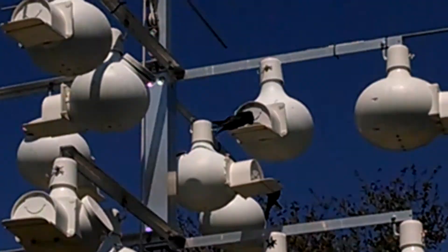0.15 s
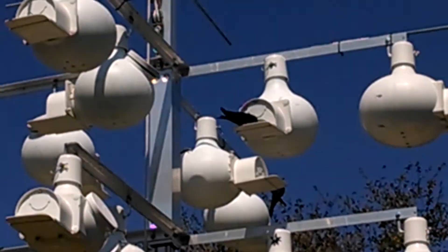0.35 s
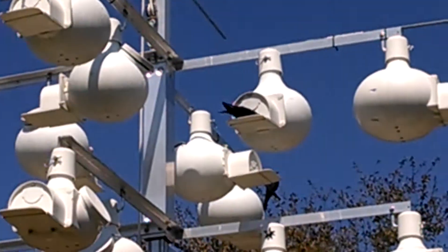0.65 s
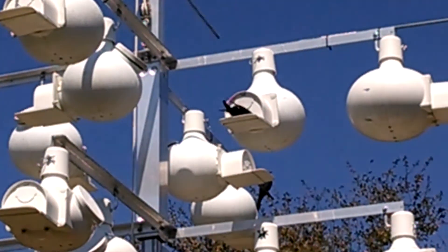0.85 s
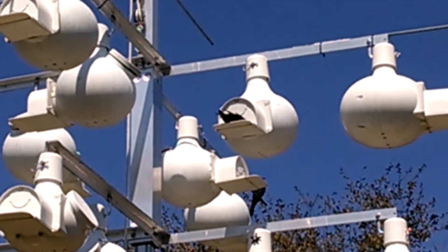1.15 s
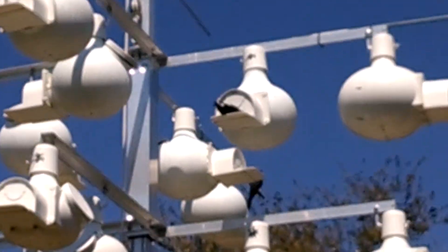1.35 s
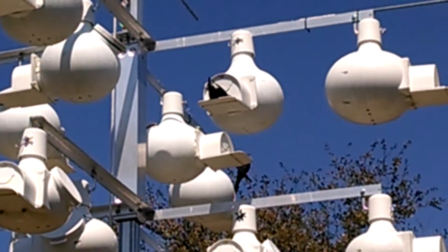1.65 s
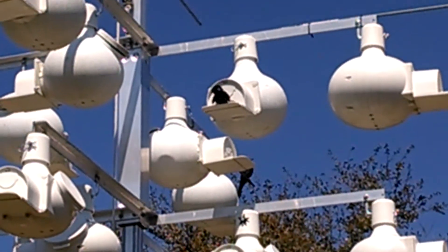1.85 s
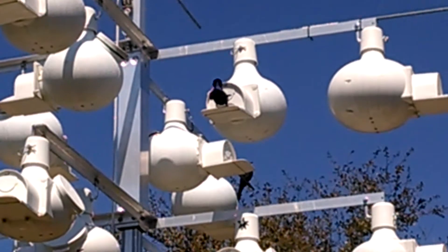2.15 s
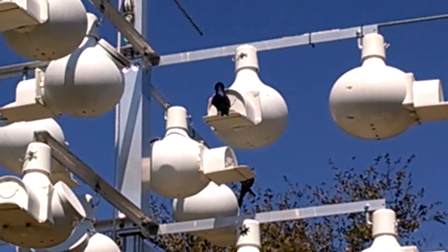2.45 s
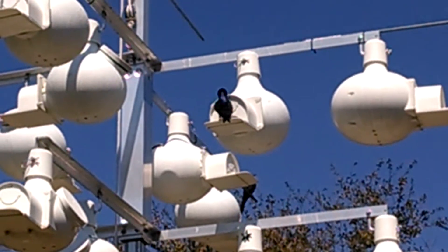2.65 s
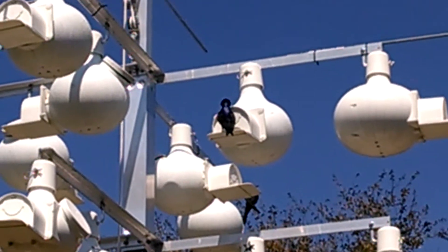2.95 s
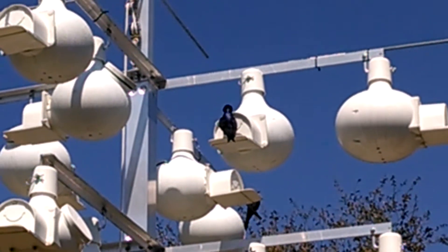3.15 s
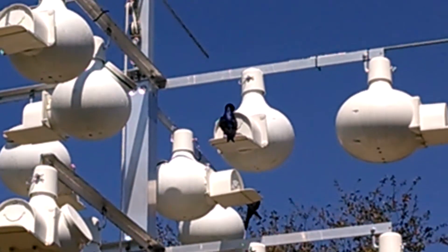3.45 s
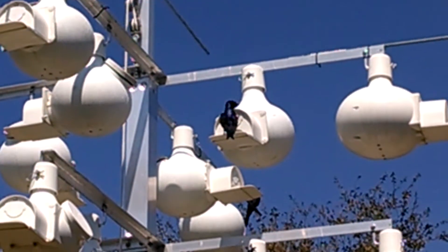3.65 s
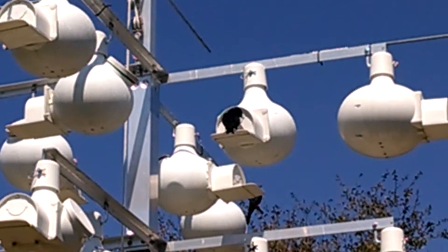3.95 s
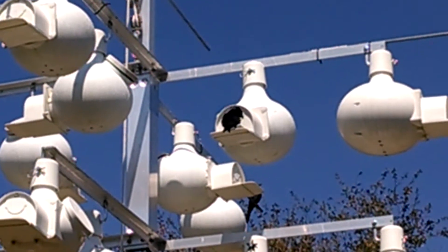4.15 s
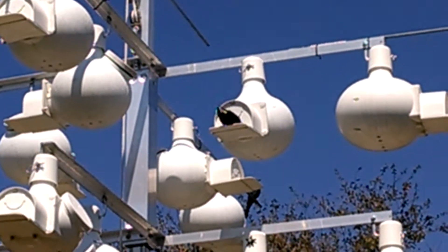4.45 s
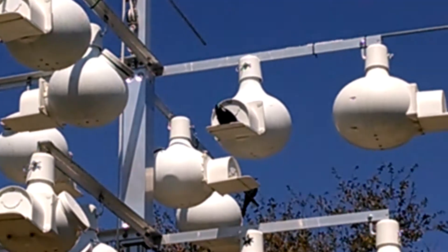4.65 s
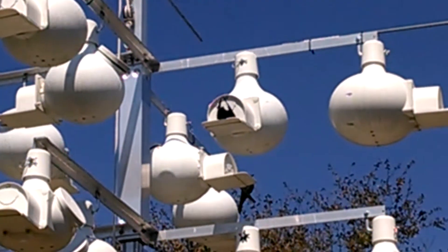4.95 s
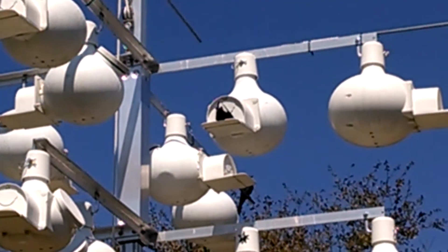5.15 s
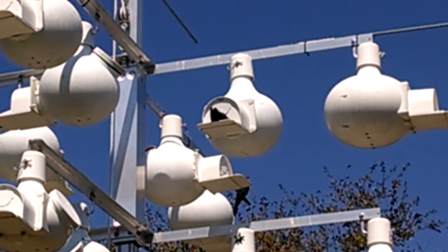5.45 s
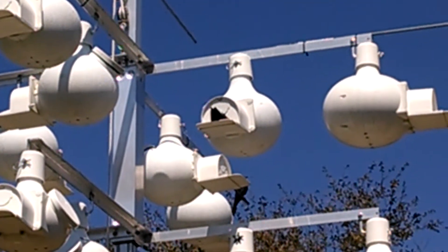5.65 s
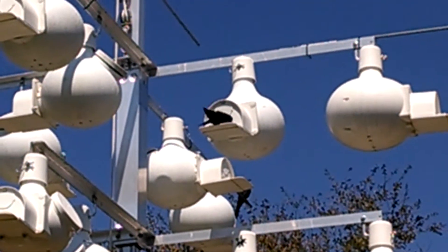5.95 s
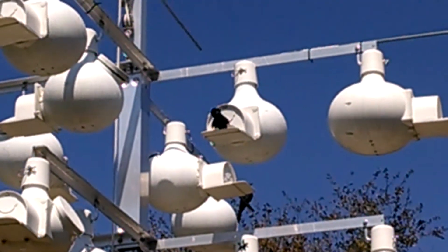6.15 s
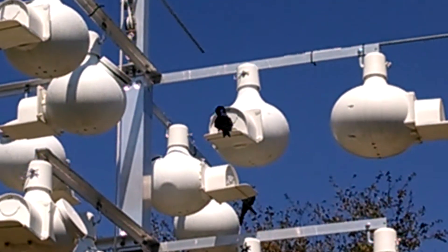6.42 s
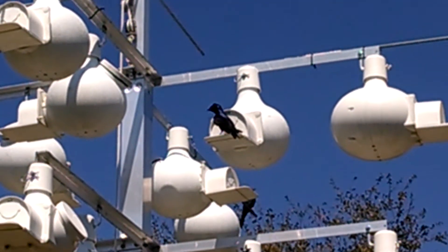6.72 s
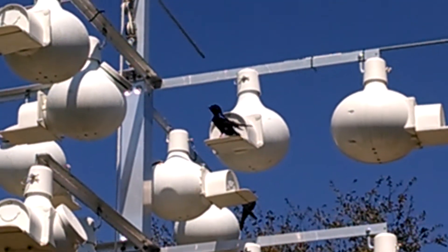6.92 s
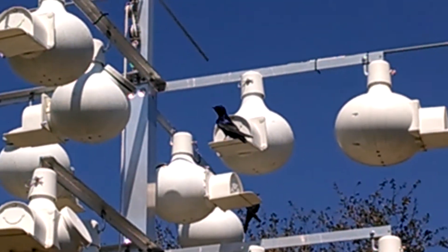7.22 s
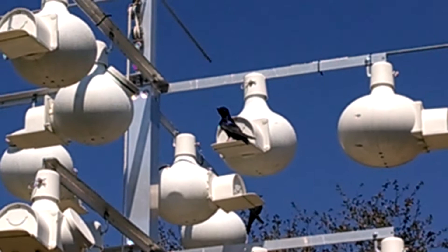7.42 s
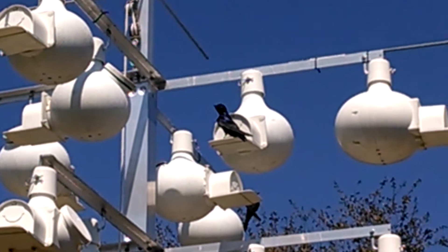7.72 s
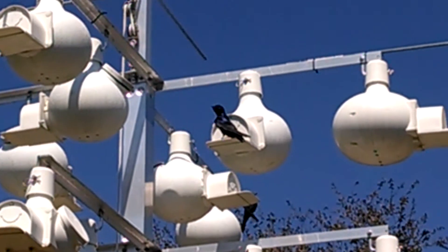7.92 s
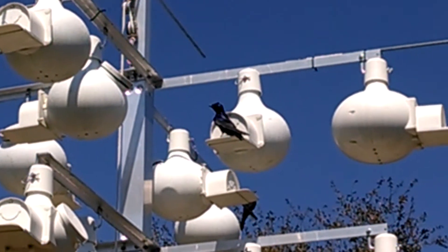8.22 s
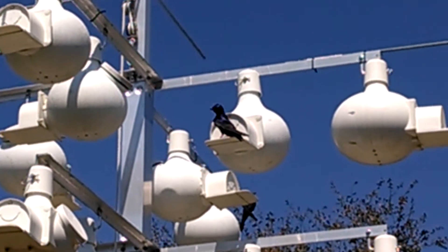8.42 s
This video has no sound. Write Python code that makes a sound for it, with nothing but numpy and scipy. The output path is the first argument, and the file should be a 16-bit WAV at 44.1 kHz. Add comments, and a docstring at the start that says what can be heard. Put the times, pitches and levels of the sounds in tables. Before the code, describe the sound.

Outdoor bird colony heard through a small camera microphone in light wind. Near martins give quick, pure gliding whistles, throaty gurgles, raspy chirps and electric-sounding buzzes, with one brief rattle; farther birds fill in with faint twitter. Chatter thins as a gust rumbles and flutters in the second second, then grows denser and brighter, continuing right to the end with light reflections from gourds and trees.

```python
"""Wind thumps softly at the microphone and a buzzy call opens the chatter of martins at a rack of nest gourds.
Each voice is a nearly pure gliding tone with weak overtones: falling strokes, trilled buzzes, a dry rattle.
Many fainter calls and a noise murmur make the farther birds; gourds and trees answer with echoes.
The wind is lumpy low noise with single pressure swings, strongest in the second second, over a faint hiss.
"""
import sys
import numpy as np
from scipy import signal
from scipy.fft import rfft, irfft, next_fast_len
from scipy.io import wavfile
from scipy.ndimage import uniform_filter1d, map_coordinates

SR = 44100
rng = np.random.default_rng(int(sys.argv[2]) if len(sys.argv) > 2 else 0)


def int16_out(signal):
    """Quantize to a 16-bit WAV file."""
    q = np.round(np.clip(np.atleast_2d(signal).T, -1, 1) * 32767)
    wavfile.write(sys.argv[1], SR, q.astype(np.int16))


N = 378378


def amp(db):
    """Decibels to gain."""
    return 10 ** (np.asarray(db) / 20)


def unit(x):
    """Scale to rms 1."""
    return x / np.sqrt(np.mean(x ** 2) + 1e-20)


def along(points, hz):
    """Read (frequency, value) points on a log frequency axis."""
    f, v = np.transpose(points)
    return np.interp(np.log(hz + 1), np.log(f + 1), v)


def curves(rows):
    """One value per sample for each column after the time."""
    s, *cols = np.transpose(rows)
    return [np.interp(np.arange(N) / SR, s, c) for c in cols]


def wobble(rate, size):
    """A smooth random curve, rate knots a second."""
    knots = rng.standard_normal(int(size * rate / SR) + 4)
    return map_coordinates(knots, [np.arange(size) * rate / SR])


def filtered(x, response):
    """x times a complex response of frequency."""
    m = next_fast_len(N + SR // 4)
    return irfft(rfft(x, m) * response(np.fft.rfftfreq(m, 1 / SR)), m)[..., :N]


def noise(spectrum):
    """Coloured noise of rms 1."""
    return unit(filtered(rng.standard_normal(N), lambda hz: amp(along(spectrum, hz))))


def add(track, s, sound):
    """Mix a sound into a track at time s."""
    start = int(np.clip(round(s * SR), 0, N))
    track[..., start:start + sound.shape[-1]] += sound[..., :N - start]


# colour of the faint hiss: (frequency [Hz], relative level [dB])
AIR_COLOUR = [(100, -2), (600, 24), (1200, 4), (5000, -17), (9300, 11.5), (11500, 4), (15000, 3)]


def air(air_db=-60):
    """Steady hiss: independent coloured noise in each channel."""
    return amp(air_db) * np.array([noise(AIR_COLOUR), noise(AIR_COLOUR)])


# strongest eddies that thump the microphone: (time [s], relative level [dB])
BUFFETS = [(.015, -13), (0.054, -12), (.686, -14.5), (0.769, -11), (.819, -14.5), (.847, -13.5),
           (.865, -16), (0.951, -8), (0.972, -12), (.985, -4.5), (1.127, -11), (1.243, -5), (1.287, 2.5),
           (1.313, -2), (1.359, -4), (1.371, -13), (1.38, 5), (1.394, -1), (1.411, -3.5), (1.489, -14),
           (1.508, -6.5), (1.53, -8), (1.586, -9), (1.601, -4), (1.621, -5.5), (1.637, -3), (1.665, -12),
           (1.747, -8.5), (1.763, -6.5), (1.774, -4), (1.821, -7.5), (1.869, -9.5), (1.927, -10),
           (1.99, -17), (2.121, -10), (2.143, -9.5), (2.262, -13), (2.325, -18), (2.412, -13),
           (2.558, -14.5), (2.616, -10.5), (2.736, -14.5), (2.896, -17.5), (2.949, -17), (2.997, -8.5),
           (3.026, -14.5), (3.423, -9.5), (3.481, -11.5), (4.133, -11), (4.597, -10.5), (4.655, -12),
           (4.696, -16), (4.714, -10), (4.766, -5.5), (5.133, -16.5), (5.186, -20), (5.334, -15),
           (5.436, -15.5), (5.534, -13.5), (5.745, -11.5), (5.815, -14), (5.889, -12), (5.915, -15.5),
           (5.931, -15), (6.314, -7), (6.606, -11), (6.64, -16), (6.724, -8), (6.742, -11.5),
           (6.786, -13.5), (6.835, -9), (6.866, -8.5), (6.956, -11.5), (6.978, -9.5), (6.998, -3.5),
           (7.034, -19), (7.056, -8), (7.205, -11.5), (7.28, -6), (7.532, -13.5), (7.831, -15.5),
           (8.082, -11.5), (8.259, -13), (8.274, -16.5), (8.384, -15), (8.408, -14.5), (8.482, -16.5)]
# an eddy's pitch at a strength of 0 dB, and the gain in strength that doubles it
EDDY_HZ, EDDY_DOUBLING_DB = 232, 26


def eddies(level_db, count=110, small_db=14, spread_db=6.0, buffet_db=-2.0, shed_db=-10, shed_s=.006, size=3):
    """A passing vortex is one pressure swing, briefer when stronger; small chance ones follow the wind's level."""
    x, t = np.zeros(N), np.arange(-SR // 50, SR // 50) / SR
    small = []
    for when, luck in rng.random((count, 2)):
        small.append((when * N / SR, level_db[int(when * N)] + small_db + spread_db * (2 * luck - 1)))
    for s, db in list(BUFFETS) + small:
        hz = EDDY_HZ * 2 ** (db / EDDY_DOUBLING_DB)
        # lesser swings scattered around the main one crackle
        shed = [(shed_s * lag, db + shed_db + 2 * luck) for lag, luck in rng.standard_normal((size, 2))]
        for lag, swing_db in [(0, db)] + shed:
            turn = np.exp(2j * np.pi * rng.random())  # random phase
            swing = np.real(turn / (1 - 1j * np.pi * hz * t) ** 3)
            add(x, s + lag + t[0], amp(swing_db + buffet_db) * swing * np.hanning(len(t)))
    return x


# level at which the wind is heard, with brief dips: (time [s], relative level [dB])
WIND_LEVEL = [(0.0, -35), (0.02, -26), (0.21, -56.5), (0.26, -41), (0.93, -30), (1.19, -42), (1.29, -20),
              (1.43, -33.5), (1.86, -30.5), (2.05, -43.5), (2.27, -30.5), (2.48, -39.5), (2.84, -38.5),
              (2.91, -30), (3.11, -41), (3.15, -62), (3.23, -34), (3.34, -49.5), (3.44, -28.5), (3.58, -48),
              (4.11, -34.5), (4.28, -40.5), (4.78, -30), (4.97, -46), (5.21, -31), (5.3, -56.5),
              (5.45, -30), (5.47, -41), (6.0, -31.5), (6.02, -38.5), (7.05, -31), (7.33, -36),
              (8.51, -38.5), (8.58, -39)]
# extra level of the flutter over that level: (time [s], relative level [dB])
FLURRY_LEVEL = [(0, -28), (.5, -13), (1.25, 2.5), (1.45, 5), (1.62, 9.5), (1.95, 0), (2.3, 0), (3.4, 0.5),
                (3.8, -0.5), (4.7, 3), (6.3, 1.5), (6.9, 0), (8.58, 0.5)]
# colour of the slow part of the wind: (frequency [Hz], relative level [dB])
RUMBLE_COLOUR = [(10, -30), (25, -2), (60, 4), (120, 0), (200, -7.5), (320, -26), (600, -76), (1200, -73)]
# colour of the quicker part of the wind: (frequency [Hz], relative level [dB])
FLUTTER_COLOUR = [(60, -40), (170, 0.5), (280, 8), (420, 0.5), (650, -19), (1000, -24.5), (1600, -40.5),
                  (4000, -75)]


def wind(rumble_db=13.5, flutter_db=-10.0, lump_db=6):
    """Turbulence at the microphone: lumpy rumble and flutter with eddies, the channels swinging in opposition."""
    low_db, = curves(WIND_LEVEL)
    flurry_db, = curves(FLURRY_LEVEL)
    lumps = np.tanh(wobble(60, N))
    rumble = unit(noise(RUMBLE_COLOUR) * amp(8.5 * lumps))
    flutter = unit(noise(FLUTTER_COLOUR) * amp(lump_db * lumps))
    x = amp(low_db + rumble_db) * rumble
    x += amp(low_db + flurry_db + flutter_db) * flutter
    x += eddies(low_db + flurry_db / 2)
    left = filtered(x, lambda hz: np.exp(-2j * np.pi * hz * .00052))  # 0.52 ms late
    return np.array([left * amp(1.6), -x * amp(-1.7)])


# decay of the trees' echo: (frequency [Hz], time to fall 60 dB [s])
TREE_DECAY = [(1500, 0.036), (3500, 0.26), (9000, 0.086)]


def echoes(x, gourds_db, trees_db, spread_s=.04, count=36):
    """Quick reflections off the gourds and a diffuse tail from the trees, drawn anew for each crossfaded stretch."""
    out, hop, t = np.zeros(N), SR // 4, np.arange(SR // 3) / SR
    for start in range(-hop, N, hop):
        lo, hi = max(start, 0), min(start + 2 * hop, N)
        piece = x[lo:hi] * np.sin(np.pi * (np.arange(lo, hi) - start) / (2 * hop))
        # tail: noise that dies at its own pace in each band, after a soft onset
        hz, age, z = signal.stft(rng.standard_normal(len(t)), SR, nperseg=256)
        decay = amp(-60 * age / along(TREE_DECAY, hz)[:, None])
        tail = signal.istft(z * decay, SR)[1][:len(t)]
        response = amp(trees_db) * unit(tail * (1 - np.exp(-t / 0.004))) / np.sqrt(len(t))
        delays = 0.0015 + spread_s * rng.random(count) ** 2
        taps = amp(gourds_db) * rng.choice([-1, 1], count) / np.sqrt(count)
        np.add.at(response, (delays * SR).astype(int), taps)
        add(out, lo / SR, signal.fftconvolve(piece, response))
    return out


def syrinx(pitch, loudness, second_db, third_db):
    """Two rows: a nearly pure whistle, and its second and third harmonics."""
    phase = 2 * np.pi * np.cumsum(pitch) / SR + rng.uniform(0, 2 * np.pi)
    overtones = amp(second_db) * np.sin(2 * phase) + amp(third_db) * np.sin(3 * phase)
    return loudness * np.array([np.sin(phase), overtones])


# how strongly a voice carries at each pitch: (pitch [Hz], relative level [dB])
VOICE_STRENGTH = [(1300, -21.5), (2000, -7.5), (2600, -4), (3400, 2), (3900, 2), (4500, 5.5), (5100, 16)]
# throat resonance that a chirp plunges through: centre, half width, boost
THROAT_HZ, THROAT_WIDTH_HZ, THROAT_DB = 3620, 200, 3.5
LATE_SWELL = 1.157  # above 1, a chirp starts softly and swells late


def chirp(length, start_hz, end_hz, bend=0.257, waver=0.017, shimmer_db=2.0, second_db=-28, third_db=-34):
    """A gliding whistle, swelling at the voice's resonances; a fall flattens out if bend > 0, else steepens."""
    u = np.linspace(0, 1, max(int(length * SR), 64))
    pitch = start_hz * (end_hz / start_hz) ** (u + bend * u * (1 - u))
    throat_db = THROAT_DB * np.exp(-((pitch - THROAT_HZ) / THROAT_WIDTH_HZ) ** 2)
    swell = np.sin(np.pi * u ** LATE_SWELL) ** 0.75
    swell = swell * amp(along(VOICE_STRENGTH, pitch) + throat_db)
    swell = swell / swell.max() * amp(shimmer_db * wobble(250, len(u)))
    return syrinx(pitch * (1 + waver * wobble(600, len(u))), swell, second_db, third_db)


# colour of the overtones: (frequency [Hz], relative level [dB])
OVERTONE_COLOUR = [(3000, -3), (4300, -13), (5200, 1), (6400, 2), (7200, -3.5), (8000, -2), (9300, 1),
                   (11500, -18), (15000, 0)]


def beak(voice, overtone_db=0):
    """The open beak joins the whistle to its overtones, made grainy and heard with their own reflections."""
    grain = .7 + .7 * wobble(1300, N)
    bright = filtered(voice[1] * grain, lambda hz: amp(along(OVERTONE_COLOUR, hz)))
    return voice[0] + amp(overtone_db) * (bright + echoes(bright, gourds_db=-3.5, trees_db=-20.0))


# kinds of faint call: (share of all calls [0-1], strokes [count], start pitch [Hz], spread of pitch [log ratio],
# stroke length [s], end over start pitch [ratio], bend of the glide [-], relative level [dB])
FAR_CALLS = [(.2, 3, 2500, 0.121, 0.02005, .62, -0.312, -6),
             (.12, 2, 1850, 0.0794, 0.01866, 0.635, -0.41, -13.5),
             (.46, 1, 4050, 0.0704, 0.016, .78, 0.019, -6.5), (.12, 1, 2950, .12, 0.022, .73, -0.019, -1),
             (.1, 1, 2400, .1, .04, 0.86, 0.37, -6)]


def far_birds(count=960, stroke_gap_s=.021, variety=.2, slope_spread=0.2785):
    """Faint gurgles, chirps and slurs, each with its own pitch, pace and slope, evened out in level."""
    voice = np.zeros((2, N))
    for share, strokes, hz, spread, length, fall, bend, db in FAR_CALLS:
        calls = round(share * count)
        draws = np.clip(rng.standard_normal((calls, 5)), -2, 2)
        for turn, (when, tune, size, slow, slope) in enumerate(draws):
            top, stretch = hz * np.exp(spread * tune), np.exp(variety * slow)
            end = top * fall ** (1 + slope_spread * slope)
            note = chirp(length * stretch, top, end, bend, waver=.016, second_db=-23, third_db=-23.5)
            note = amp(db + 3 * size) * note
            s = (turn + when) / calls * N / SR
            for stroke in range(round(strokes)):
                add(voice, s + stroke * stroke_gap_s * stretch, note)
    x = unit(beak(voice, overtone_db=2.0))
    return x / np.sqrt(np.abs(uniform_filter1d(x ** 2, size=4500)) + 0.42)


# level at which the farther chatter is heard, sinking between 1.1 and 1.9 s: (time [s], relative level [dB])
CROWD_LEVEL = [(0, -40), (.3, -54), (.47, -37.5), (.66, -41.5), (.8, -39), (1.1, -49), (1.5, -53.5),
               (2.1, -45), (2.9, -41.5), (3.3, -44), (3.8, -41), (4.2, -36), (4.9, -39), (5.6, -36.5),
               (6.5, -40), (7.1, -39), (7.8, -38), (8.1, -37.5), (8.58, -38)]
# colour of the blurred murmur, shared by the rasp of the near calls: (frequency [Hz], relative level [dB])
MURMUR_COLOUR = [(600, -15.5), (1000, -14), (1250, -8), (1550, -19.5), (2000, -7), (2600, -8.5),
                 (3400, -35), (4100, -8.5), (5100, -7.5), (6400, -19.5), (8000, -36.5), (9300, -18.5),
                 (11500, -28)]


def crowd(far_db=1):
    """The farther birds with their echoes, over a murmur of coloured noise."""
    crowd_db, = curves(CROWD_LEVEL)
    far = far_birds()
    far = unit(far + echoes(far, gourds_db=-4, trees_db=-7.5))
    murmur = amp(-11) * noise(MURMUR_COLOUR)
    return amp(crowd_db + far_db) * (far + murmur)


# thin rising whistles: (time [s], length [s], start pitch [Hz], end pitch [Hz], relative level [dB])
SQUEAKS = [(5.769, 0.027, 5150, 6570, -35), (6.045, 0.036, 5500, 6200, -41)]


def squeaks(squeak_db=0):
    """Thin whistles that glide upward, without overtones."""
    voice = np.zeros((2, N))
    for s, length, start_hz, end_hz, db in SQUEAKS:
        add(voice[0], s, amp(db + squeak_db) * chirp(length, start_hz, end_hz)[0])
    return voice


# sliding whistles: (time [s], length [s], start pitch [Hz], end pitch [Hz], relative level [dB])
SLURS = [(2.373, 0.063, 3480, 1920, -33), (4.874, 0.033, 2270, 2050, -37), (5.439, 0.06, 2950, 2060, -36),
         (5.637, 0.11, 2770, 1766, -33.5), (6.153, 0.0325, 2640, 2220, -32),
         (6.307, .075, 2450, 1907, -29.5), (6.616, 0.063, 3500, 1960, -26.5),
         (6.681, 0.055, 2120, 1907, -31.5), (6.804, 0.034, 2020, 1835, -31),
         (7.767, 0.02, 2270, 2130, -34.5), (8.097, 0.0436, 2103, 1736, -34),
         (8.14, 0.044, 2560, 2063, -25.5), (8.177, .035, 2090, 1960, -36)]


def slurs(slur_db=0):
    """Clear whistles that slide down and level off."""
    voice = np.zeros((2, N))
    for s, length, start_hz, end_hz, db in SLURS:
        note = chirp(length, start_hz, end_hz, bend=0.36, waver=0.0021, shimmer_db=-4.5,
                     second_db=-22.0, third_db=-27.0)
        add(voice, s, amp(db + slur_db) * note)
    return voice


# gurgles, each a run of low falling strokes: (time [s], relative level [dB])
GURGLES = [(-.018, -38), (0.156, -28), (.403, -25), (0.572, -23), (6.453, -30)]
# strokes of a gurgle: spacing, length, highest start, end over start; the outer strokes are lower and softer
STROKE_GAP_S, STROKE_S, STROKE_HZ, STROKE_FALL, EDGE_OCTAVES, EDGE_DB = .02, .022, 2643, .53, 0.435, 15.5


def gurgles(count=5):
    """Runs of quick, steepening strokes that arch in pitch and strength."""
    voice = np.zeros((2, N))
    for s, db in GURGLES:
        for stroke, edge in enumerate(np.linspace(-1, 1, count) ** 4):
            top = STROKE_HZ * 2 ** (-EDGE_OCTAVES * edge)
            note = chirp(STROKE_S, top, top * STROKE_FALL, bend=-.5, second_db=-14, third_db=-18)
            add(voice, s + stroke * STROKE_GAP_S, amp(db - EDGE_DB * edge) * note)
    return voice


# rasp of the harshest chirps: (time [s], length [s], relative level [dB])
SCREECHES = [(0.726, 0.22, -37.5), (0.915, 0.14, -41), (1.225, 0.12, -44), (1.963, 0.12, -52),
             (2.47, 0.13, -41.5), (3.112, 0.082, -39.5), (3.72, 0.21, -44), (4.723, 0.28, -44.5)]
# colour of that rasp: (frequency [Hz], relative level [dB])
SCREECH_COLOUR = [(2000, -9), (4200, 0.5), (5200, -6), (6400, -2), (7900, -5), (9300, -2.5), (11000, -29),
                  (15000, -24)]


def screeches(screech_db=-3):
    """Bright, flickering noise for the harshest chirps: a quick rise and a slower fade."""
    force = np.zeros(N)
    for s, length, db in SCREECHES:
        u = np.linspace(0, 1, int(length * SR))
        add(force, s, amp(db + screech_db) * np.sin(np.pi * np.sqrt(u)) ** 2)
    return force * unit(noise(SCREECH_COLOUR) * amp(3 * wobble(400, N)))


# one bird's rattle: start and spacing of the pips; how long it holds its pitch and level, then how they fall
RATTLE_S, PIP_GAP_S = 2.82, .0138
RATTLE_HOLD_S, RATTLE_HZ, RATTLE_SAG_HZ_PER_S, RATTLE_DB, RATTLE_FADE_DB_PER_S = .055, 3570, 8500, -18.5, 132


def rattle(pip_s=0.0084, drop=0.14, low_ratio=.55, low_db=-13, count=12):
    """Separate pips, each a brief drop in pitch over a low second voice; the train holds, then sags and fades."""
    voice, u = np.zeros((2, N)), np.linspace(0, 1, int(pip_s * SR))
    for pip in range(count):
        age = pip * PIP_GAP_S
        late = max(age - RATTLE_HOLD_S, 0)
        glide = 1 + drop * (.5 - u) + 0.06 * wobble(600, len(u))
        pitch = (RATTLE_HZ - RATTLE_SAG_HZ_PER_S * late) * glide
        swell = amp(RATTLE_DB - RATTLE_FADE_DB_PER_S * late) * np.sin(np.pi * u) ** 2
        low_pitch = low_ratio * pitch * (1 + 0.12 * wobble(480, len(u)))
        add(voice, RATTLE_S + age, syrinx(pitch, swell, second_db=-22, third_db=-29))
        add(voice, RATTLE_S + age, syrinx(low_pitch, amp(low_db) * swell, second_db=-20, third_db=-13))
    return voice


def buzz(length, pitches, crest, rough, overtone_db, trill_hz, low_ratio=.58, low_db=-27):
    """A curved note trilled too fast to follow; roughness deepens its pulses and lifts a low second voice."""
    u = np.linspace(0, 1, int(length * SR))
    n = len(u)
    trill = 2 * np.pi * np.cumsum(trill_hz * (1 + .09 * wobble(90, n))) / SR
    curve = np.polyval(np.polyfit([0, .5, 1], pitches, 2), u)
    pitch = curve * (1 + .036 * rough * wobble(500, n))
    swell = np.sin(np.pi * np.interp(u, [0, np.clip(crest, .22, .9), 1], [0, .5, 1])) ** .7
    harshness = rough / ROUGH_AT_FULL
    pulse = unit(amp(5.2 * harshness * np.sin(trill)))
    bend = 1 + .029 * np.cos(trill)
    voice = syrinx(pitch * bend, swell * pulse, second_db=overtone_db, third_db=overtone_db - 7.5)
    low_pitch = low_ratio * pitch * (1 + .05 * wobble(300, n))
    low_swell = amp(low_db) * harshness ** 2 * swell * pulse
    return voice + syrinx(low_pitch, low_swell, second_db=-24, third_db=-24)


# buzzy calls: (time [s], length [s], start pitch [Hz], middle pitch [Hz], end pitch [Hz], relative level [dB],
# relative level of overtones [dB], trill rate [Hz])
BUZZY_CALLS = [(0.067, 0.077, 3400, 3573, 3150, -17.5, -25, 170.3),
               (1.033, 0.089, 3410, 3167, 2486, -25.5, -27, 160.8),
               (3.384, 0.046, 3870, 3570, 3380, -30.5, -18, 110),
               (3.422, 0.068, 3380, 3340, 2730, -22, -29, 128),
               (3.649, 0.098, 3476, 2857, 2780, -24, -20, 162.4),
               (3.731, 0.072, 2900, 2864, 2800, -28.5, -22, 158),
               (4.039, 0.11, 4180, 3402, 3990, -15, -21.5, 305),
               (4.142, 0.038, 3500, 3160, 2700, -23.5, -27, 157.4),
               (4.684, 0.085, 3030, 3363, 2804, -13.5, -24.5, 141),
               (5.27, 0.092, 3360, 3532, 3015, -12, -35, 292.5),
               (5.536, 0.09, 3880, 3350, 3360, -23, -29, 289.5),
               (5.753, 0.068, 3180, 3560, 3770, -27.5, -26, 172),
               (5.923, 0.12, 4086, 3472, 3680, -12.5, -35, 297),
               (6.195, 0.085, 3344, 3267, 2640, -19, -19.5, 123.8),
               (6.328, 0.13, 3910, 3456, 3726, -13.5, -35.5, 292),
               (7.161, 0.04, 3640, 3495, 2970, -13.5, -31, 221),
               (7.607, 0.06, 3610, 3450, 3440, -20, -33, 297),
               (7.835, 0.09, 3800, 3502, 3250, -28, -33, 153),
               (7.965, 0.06, 3730, 3134, 2890, -30, -36, 160),
               (8.381, 0.06, 3406, 3413, 3040, -18, -19, 167),
               (8.438, 0.061, 3294, 3070, 2850, -24, -18, 169)]
# a buzz is loudest this far through (0-1); at full voice it is purer, and rougher the softer it is
CREST, FULL_VOICE_DB, ROUGH_AT_FULL, ROUGH_PER_DB = 0.33, -15.5, 0.45, .025


def buzzy_calls(call_db=0, rasp_db=-19):
    """The buzzes, and the strain that drives their rasp: relatively greater the rougher the call."""
    calls, strain = np.zeros((2, N)), np.zeros(N)
    for s, length, *pitches, db, overtone_db, trill_hz in BUZZY_CALLS:
        rough = ROUGH_AT_FULL + ROUGH_PER_DB * (FULL_VOICE_DB - db)
        add(calls, s, amp(db + call_db) * buzz(length, pitches, CREST, rough, overtone_db, trill_hz))
        add(strain, s, amp(db + rasp_db) * rough ** 2 * signal.windows.tukey(int(length * SR)))
    return calls, strain


# falling strokes, a few high ones being octave overtones of low chirps:
# (time [s], length [s], middle pitch [Hz], relative level [dB])
FALLING_STROKES = [(0.435, 0.012, 3150, -25), (0.739, 0.028, 3390, -17.5), (0.765, 0.033, 2280, -24),
                   (0.776, 0.02, 4250, -26.5), (0.795, 0.041, 2340, -26), (0.806, 0.016, 4350, -25),
                   (0.824, 0.014, 4240, -27), (0.815, 0.031, 2100, -28), (0.934, 0.031, 3616, -14),
                   (0.962, 0.029, 2284, -30.5), (0.966, 0.019, 4220, -30), (1.228, 0.031, 3563, -16.5),
                   (1.264, 0.023, 4200, -33), (1.255, 0.034, 2107, -29.5), (1.496, 0.026, 3280, -39),
                   (1.625, 0.021, 3480, -36), (1.918, 0.044, 2113, -27.5), (1.959, 0.047, 2093, -27.5),
                   (1.975, 0.03, 3565, -19.5), (2.002, 0.036, 2115, -27.5), (2.177, 0.04, 3530, -29),
                   (2.415, 0.027, 3760, -32.5), (2.448, 0.033, 1990, -34), (2.475, 0.02, 3696, -12),
                   (2.505, 0.031, 4030, -25), (2.5, 0.024, 2090, -31), (2.52, 0.037, 2250, -31.5),
                   (2.706, 0.019, 2090, -35.5), (2.665, 0.021, 3560, -29), (3.079, 0.024, 3330, -28.5),
                   (3.126, 0.035, 3915, -8), (3.749, 0.032, 2220, -24), (3.797, 0.035, 2093, -20.5),
                   (3.833, 0.031, 2092, -25), (4.274, 0.087, 3780, -29.5), (4.471, 0.024, 3550, -19.5),
                   (4.48, 0.039, 3470, -21), (4.657, 0.058, 3510, -24.5), (4.765, 0.022, 3740, -14.5),
                   (4.783, 0.024, 3460, -13.5), (4.824, 0.028, 4140, -24), (4.949, 0.023, 3420, -17.5),
                   (4.976, 0.084, 3720, -24), (5.019, 0.046, 1916, -30.5), (5.094, 0.015, 3490, -23),
                   (5.258, 0.027, 3700, -14.5), (5.414, 0.033, 3905, -19.5), (5.611, 0.036, 3810, -13),
                   (6.084, 0.038, 3560, -11), (6.12, 0.04, 2207, -30.5), (6.299, 0.024, 2166, -27),
                   (6.549, 0.035, 3570, -31), (6.73, 0.018, 3940, -36.5), (6.812, 0.026, 3370, -33),
                   (7.084, 0.031, 3650, -28.5), (6.87, 0.021, 3390, -27), (6.98, 0.043, 3300, -25.5),
                   (7.013, 0.017, 3950, -26), (7.026, 0.015, 3360, -26), (7.24, 0.045, 3190, -26),
                   (7.307, 0.0099, 3410, -19.5), (7.336, 0.016, 2870, -22.5), (7.457, 0.053, 3300, -29.5),
                   (7.535, 0.01, 3370, -24), (7.598, 0.014, 2136, -28.5), (7.666, 0.015, 2130, -27.5),
                   (7.866, 0.017, 1897, -30), (7.819, 0.029, 3470, -14.5), (7.797, 0.016, 3450, -26.5),
                   (7.862, 0.02, 3565, -23), (7.9, 0.033, 2380, -25), (8.237, 0.019, 4030, -27.5),
                   (8.087, 0.012, 3460, -20), (8.203, 0.021, 3550, -18), (8.464, .014, 3400, -24.5),
                   (8.489, 0.014, 3360, -21.5), (8.505, 0.032, 2200, -28)]
# a typical stroke and how far it falls; longer and higher ones fall farther, by these powers
CHIRP_S, CHIRP_HZ, FALL_OCTAVES, FALL_BY_LENGTH, FALL_BY_PITCH = .035, 3497, 0.71, .5, 0.39
THROATY_DB = 0  # a low stroke's own octave, against its fundamental


def plunges(chirp_db=0.5, clear_db=-27):
    """Falling strokes, each through its middle pitch; a few high ones are octave overtones of low chirps."""
    voice = np.zeros((2, N))
    for s, length, hz, db in FALLING_STROKES:
        octaves = FALL_OCTAVES * (length / CHIRP_S) ** FALL_BY_LENGTH * (hz / CHIRP_HZ) ** FALL_BY_PITCH
        reach = 2 ** (octaves / 2)
        octave_db = np.interp(hz, [2200, 2700], [THROATY_DB, clear_db])
        note = chirp(length, hz * reach, hz / reach, second_db=octave_db, third_db=-27.5)
        add(voice, s, amp(db + chirp_db) * note)
    return voice


# the nearest gourd throws the calls straight back: delay, strength
GOURD_S, GOURD_DB = .0059, -12


def near_birds(rattle_rasp_db=-9):
    """The birds on the rack, the buzzes and rattle with noisy rasp, all doubled by one close reflection."""
    whistles = plunges() + gurgles() + slurs() + squeaks()
    pips = rattle()
    calls, strain = buzzy_calls()
    strain += amp(rattle_rasp_db) * uniform_filter1d(np.abs(pips[0]), size=300)
    rasp = strain * unit(noise(MURMUR_COLOUR) * amp(3.0 * wobble(340, N)))
    voices = beak(whistles, overtone_db=-3) + beak(calls + pips, overtone_db=-1.0)
    voices = voices + rasp + screeches()
    return filtered(voices, lambda hz: 1 + amp(GOURD_DB) * np.exp(-2j * np.pi * hz * GOURD_S))


# left minus right for airborne sound: (frequency [Hz], level difference [dB])
BALANCE_LR = [(800, 3), (1400, -7.5), (2000, 8), (2250, 0.5), (2750, -13), (3500, -0.5), (4000, -4.5),
              (4600, -8.5), (5200, -2.5), (6000, 1.5), (7000, -6.5), (7900, -2), (10000, 2)]
# lead of left over right for airborne sound: (frequency [Hz], phase [rad])
PHASE_LR = [(0, 0), (1720, .1), (3010, -4.6), (6630, -12.9), (15300, -34.8)]


def ports(x):
    """The two microphone ports hear the colony with a lag and a colour of their own."""
    def response(hz):
        # each port takes half of the difference
        lead = np.interp(hz, *np.transpose(PHASE_LR))
        half = amp(along(BALANCE_LR, hz) / 2) * np.exp(.5j * lead)
        pair = np.array([half, 1 / half])
        return pair / np.sqrt(np.mean(np.abs(pair) ** 2, axis=0))
    return filtered(x, response)


def colony():
    """Near birds in front of the farther chatter, with echoes ahead and to the sides."""
    near, far = near_birds(), crowd()
    # sound scattered from the sides differs between the ports
    wide = echoes(near + far, gourds_db=-20, trees_db=-30)
    ahead = near + echoes(near, gourds_db=-10, trees_db=-15) + far
    return ports(np.array([ahead + wide, ahead - wide]))


def scene():
    """A faint even hiss, wind and birds."""
    return air() + wind() + colony()


# resonances and notches of the camera's case: (centre [Hz], width [Hz], gain [dB])
HOUSING = [(755, 10, -5), (904, 23, 0), (1030, 15, -3), (1356, 38, 6), (2890, 21, 8.5), (2932, 70, -27),
           (3000, 15, 5.5), (3209, 78, -35), (3273, 100, 6.5), (4203, 39, -16), (4925, 600, -12)]


def housing(hz):
    """The camera's case as a chain of resonances and notches, most of them narrow."""
    response = 1
    for centre, width, db in HOUSING:
        band = 1j * hz * width / (centre ** 2 - hz ** 2 + 1j * hz * width)
        response = response * (1 + (amp(db) - 1) * band)
    return response


TOP_HZ = 15500  # the camera's band limit


def record(dry):
    """The camera colours the sound, rounds off the hardest peaks and keeps nothing above its band limit."""
    x = filtered(dry, housing)
    rounded = x / (1 + np.abs(x) ** 6) ** (1 / 6)
    return filtered(rounded, lambda hz: hz < TOP_HZ)


dry = scene()
out = record(dry)
int16_out(out)
```